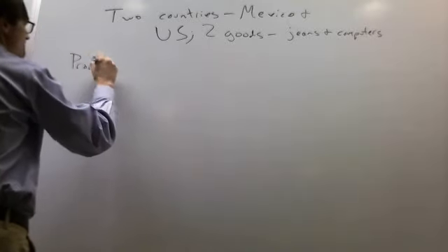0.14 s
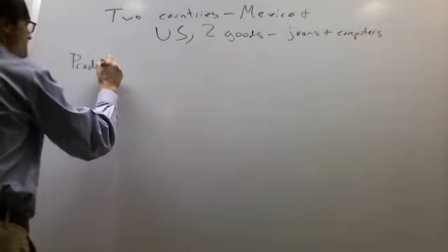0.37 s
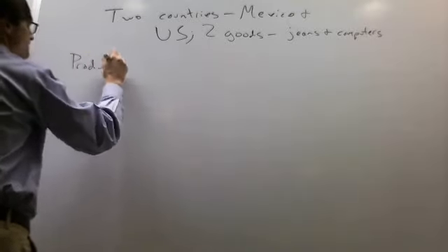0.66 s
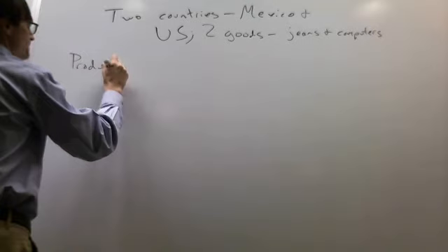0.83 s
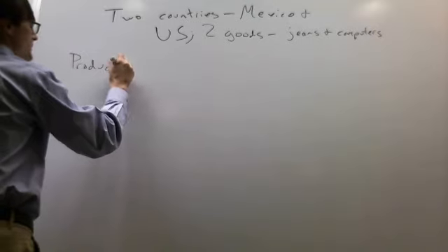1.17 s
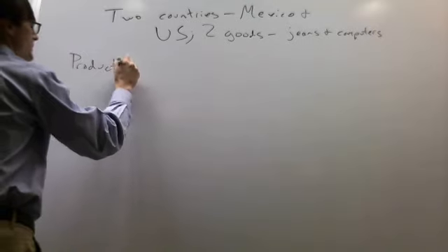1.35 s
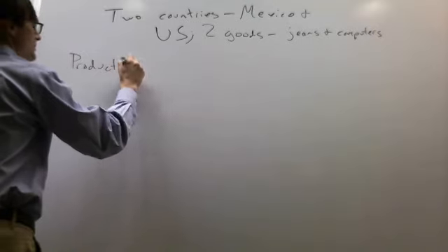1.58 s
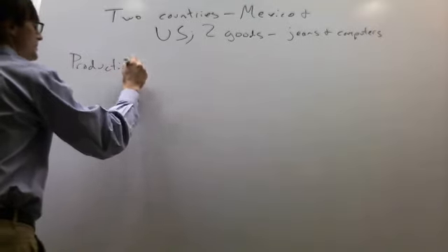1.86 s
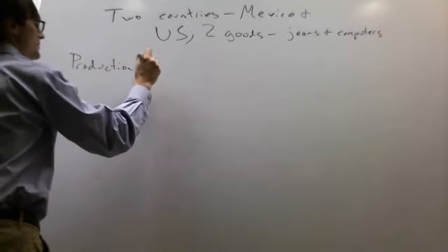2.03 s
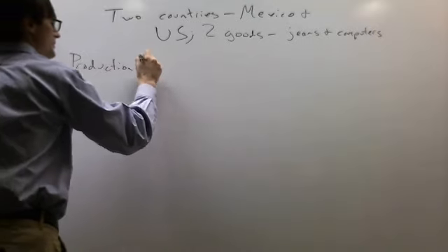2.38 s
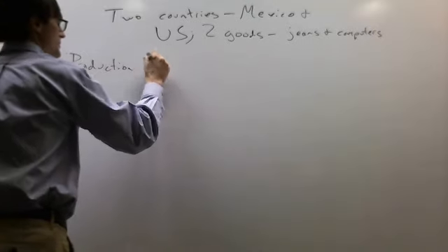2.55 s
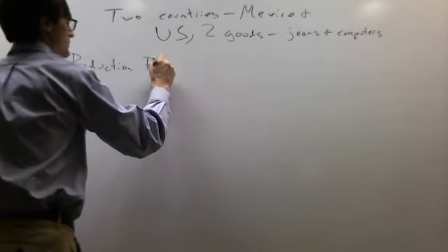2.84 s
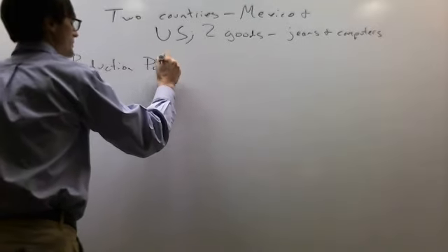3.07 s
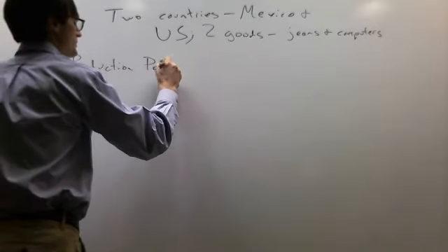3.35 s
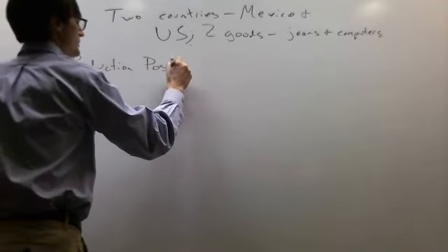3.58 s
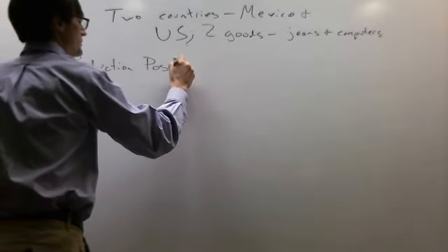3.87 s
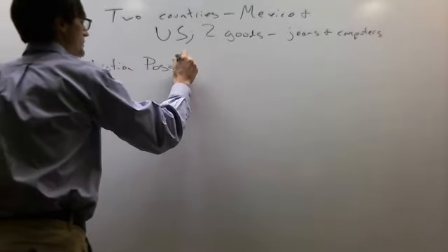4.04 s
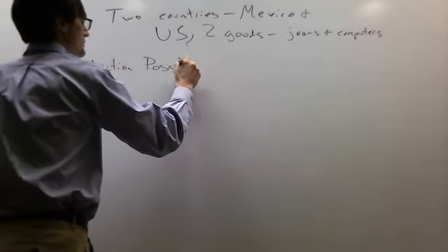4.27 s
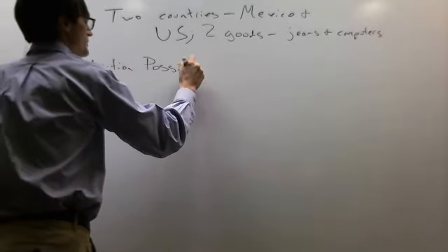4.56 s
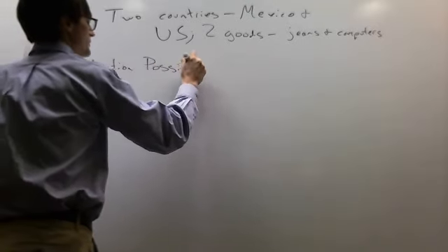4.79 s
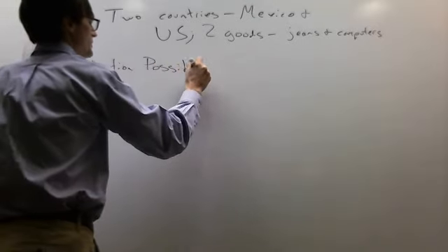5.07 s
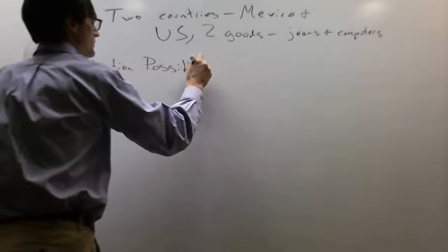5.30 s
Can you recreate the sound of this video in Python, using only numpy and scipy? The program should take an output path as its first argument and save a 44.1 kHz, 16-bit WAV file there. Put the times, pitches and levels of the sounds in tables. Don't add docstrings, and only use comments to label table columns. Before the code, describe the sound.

A felt marker writes on a hollow whiteboard in a lecture room, heard through a small, dull microphone. Very faint low ventilation hum runs throughout. After a tiny bump and light felt hiss, soft hollow knocks start at 0.2 s and continue at about 0.46, 0.7, 0.95, 1.1, 1.3, 1.4 and 1.7 s, the later ones lighter and some brighter. Near 0.5 s a scuff carries a very brief, faint squeak. After a gap, the strongest knock lands at 2.3 s, with a light second touch; firm taps follow at 2.6, 2.9, 3.2, 3.6 and 3.9 s, the last with a sharper tick. Quick duller taps come at 4.0 and 4.2 s, then a pause, then weaker, muffled ones from 4.6 to 5.4 s. Each knock rings the panel around the low mids, returns as lumpy wall echoes with a small slap a tenth of a second later, and is cut short.

```python
import sys
import numpy as np
from scipy import signal
from scipy.io import wavfile
from scipy.ndimage import uniform_filter1d

SR = 44100
rng = np.random.default_rng(int(sys.argv[2]) if len(sys.argv) > 2 else 0)


def voltage_ratio(level):
    return 10 ** (np.asarray(level, float) / 20)


def bounce(signal):
    frames = np.transpose(np.atleast_2d(signal))
    limited = np.clip(frames, -1, 1)
    pcm = np.round(limited * 32767).astype(np.int16)
    wavfile.write(sys.argv[1], SR, pcm)


N = 239259

# start_s, force_db, hardness_db (high ring over low), room_db, open_s (until suppressor closes)
LANDINGS = [(.19, -31, -7, -41, 0.12), (.464, -28.5, -5.5, -39, 0.13), (0.698, -27, -9.5, -40.5, 0.13),
            (0.947, -30.5, -7.5, -42, .095), (1.111, -33.5, 3, -39, 0.12),
            (1.283, -40.5, -9.5, -49.5, 0.025), (1.429, -34.5, .5, -40, 0.08), (1.719, -36.5, 5, -41, 0.11),
            (2.308, -23.5, -4.5, -37.5, 0.15), (2.565, -29, -4.5, -43.5, 0.12), (2.877, -29, -3, -41, .15),
            (3.223, -27, -7, -41.5, 0.13), (3.572, -26.5, -3.5, -40.5, .15), (3.882, -29, 0.5, -40.5, .17),
            (4.039, -29, -10.5, -46, .115), (4.202, -33, -16, -50.5, 0.064), (4.64, -36.5, -3, -46.5, 0.11),
            (4.813, -34.5, -12.5, -45.5, 0.078), (4.971, -30.5, -17, -42.5, .095),
            (5.186, -37.5, -9, -46.5, 0.1), (5.363, -35.5, -14, -53, 0.061)]
# start_s, low_ring_hz, high_ring_hz, low_modes_db (over the rest),
# thud_db (re room answer)
HAND_PLACE = [(.19, 540, 724, 0, -13.5), (.46, 530, 740, 4, -24.5), (.95, 537, 737, 5, -15.5),
              (1.43, 522, 719, 11, -28), (1.72, 453, 730, 10, -28), (2.3, 453, 679, -1.5, -9.5),
              (2.88, 477, 732, -2.5, -14.5), (3.22, 504, 730, -9, -18), (3.57, 484, 725, -10.5, -13.5),
              (3.88, 464, 712, -5, -15.5), (4.2, 469, 662, -9, -9.5), (4.64, 467, 677, 1.5, -11),
              (4.81, 470, 735, 4.5, -11), (4.97, 483, 887, 2, -11.5), (5.19, 473, 656, 1.5, -9),
              (5.36, 473, 887, 2.5, -7)]
# start_s, level_db, pitch_hz
BUMPS = [(.002, -61, 276), (0.062, -65, 272), (.25, -38, 150), (0.291, -49, 140), (2.669, -52, 163),
         (2.98, -50, 137.5), (3.34, -48, 261), (3.988, -57, 110), (4.145, -46.5, 129), (4.75, -51, 173),
         (4.919, -55, 258), (5.073, -48, 162), (0.144, -72, 285), (0.414, -55, 276), (0.914, -62, 416),
         (2.154, -59.5, 450), (2.239, -59, 293), (2.284, -83, 443), (2.736, -55.5, 351), (3.41, -58.5, 342),
         (4.602, -53.5, 269)]
# start_s, scuff_db, tick_db
SKIDS = [
    (0.466, -56.5, -60),
    (.7, -80, -61),
    (1.114, -58.5, -66),
    (1.434, -70.5, -61),
    (2.305, -68, -60),
    (2.874, -61, -78),
    (3.221, -69.5, -58.5),
    (3.881, -60, -55),
    (5.187, -73, -67),
]
# start_s, level_db, pitch_hz
RETOUCHES = [(.575, -51, 555), (.822, -59, 534), (1.222, -56.5, 649), (2.416, -44, 560),
             (2.688, -50.5, 600), (2.99, -58, 547), (3.338, -53, 562), (3.686, -51, 600), (3.995, -55, 600)]
# pitch_hz, level_db, t60_s
LOW_MODES = [(254.7, -8, 0.27), (286.7, -13.5, 0.15), (333.3, 0.5, 0.12), (413, -3, 0.11),
             (443.4, -6.5, 0.059)]
MIDDLE_MODES = [(467, -4.5, 0.084), (507, -0.5, .1), (543, -1, 0.15), (582.4, -3.5, 0.14),
                (630, -4.5, 0.11)]
TOP_MODES = [(687.6, 6, 0.039), (773, -2, 0.073), (827.3, -6, 0.071), (914, -15, 0.063), (1053, -21, 0.041)]
THUD_MODES = [(79, -18.5, 0.066), (134, -7.5, 0.093), (142.7, -0.5, 0.23), (204.3, -3, 0.29)]
# delay_s, low_modes_db, upper_modes_db, thud_db
WALL_ECHOES = [(0.013, 3.5, 2.5, 4), (0.021, -2, -1, 2.5), (0.033, 2.5, 2.5, -25), (.053, 4, 8, 3.5),
               (.069, -8, 6, -8.5), (.083, 2.5, -1.5, -17), (0.092, -3, 5, -1.5), (.117, -7.5, -8.5, 14),
               (.129, -12.5, 6.5, -12), (.149, 1, -2.5, -4.5), (.168, 8, 1.5, -1.5), (.19, -14, 7.5, -9.5)]
# start_s, length_s, hiss_db, centre_hz, spread_octaves
FELT_STROKES = [(0, 0.27, -81, 5320, .35), (0.202, 0.092, -73, 5340, 0.15), (0.28, 0.094, -78, 5350, 0.26),
                (0.462, 0.025, -70, 5270, 0.18), (0.487, 0.058, -78.5, 5200, 0.3),
                (0.694, 0.11, -83.5, 5200, 0.34), (0.966, 0.046, -79, 5500, .25),
                (1.13, 0.035, -79.5, 4600, 0.35), (1.433, 0.029, -78.5, 5500, 0.256),
                (1.846, 0.13, -84.5, 5360, 0.28), (2.303, 0.088, -80, 4030, 0.18),
                (2.293, 0.054, -78.5, 5500, 0.11), (2.575, 0.13, -84, 5300, 0.31),
                (2.833, 0.019, -75.5, 5800, 0.08), (2.865, 0.06, -80, 4800, 0.36),
                (3.101, 0.13, -85, 5430, 0.11), (3.117, 0.082, -91, 7900, 0.12),
                (4.165, 0.029, -86, 5500, .2), (4.23, 0.13, -78.5, 4640, .4),
                (4.43, 0.061, -87, 5500, 0.14), (4.962, 0.11, -84.5, 5160, 0.31),
                (5.277, 0.045, -83, 5300, 0.057)]
# time_s, level_db, stick_slip_hz
SQUEAK = [
    (0.465, -77, 1700),
    (0.497, -61, 1735),
    (0.521, -75.5, 1720),
    (0.535, -66, 1630),
]
# multiple (of stick-slip rate), level_db
SQUEAK_ORDERS = [(1, 6.5), (1.06, 2.5), (1.15, -18.5), (.94, -0.5), (2, 1.5), (1.92, -1), (1.96, -8)]
# pitch_hz, density_db_per_hz
AIR_SPECTRUM = [(18, -74), (30, -52), (60, -23), (99, -7.5), (289, 0), (380, -7), (478, -7), (690, -13),
                (1120, -21), (1540, -23.5), (4110, -31), (5930, -25.5), (7120, -32), (7500, -41),
                (9000, -45), (11900, -45)]
# pitch_hz, level_db
WHINE = [(8000, -111)]

TICK_DB, TICK_PER_HARD = -40.5, 0.24
SCUFF_DB, SCUFF_PER_HARD = -36, 0.56
EDGE_DB, EDGE_PER_HARD = -15, 0.94
TOP_DB, TOP_PER_HARD = -3.5, 0.65
FADE_DB_PER_S, CUT_DB_PER_S = 89, 382
THUD_FADE_DB_PER_S, THUD_CUT_DB_PER_S, THUD_OPEN_SHARE = 33.5, 224.5, 0.34
FAR_WALL_S, LULL_DB, LULL_S, REBOUND_DB, REBOUND_S = 0.1085, -8.5, 0.029, 1, 0.026
AIR_DB, SETTLE_S = -66.5, 0.55
MID_DB, EARLY_MID_DB, TOP_HISS_DB, EARLY_TOP_DB = 1.13, 3.5, 2.5, -12


def knocks():
    out, t = np.zeros(N), np.arange(round(0.07 * SR)) / SR
    scuff_shape = (1 - np.exp(-t / 0.0019)) * np.exp(-t / 0.017)
    grits = rng.standard_normal((len(LANDINGS), len(t)))
    for (s, force_db, hard_db, *_), grit in zip(LANDINGS, grits):
        low_hz, high_hz, *_ = curve(HAND_PLACE, s)
        tick_db = force_db + TICK_DB + TICK_PER_HARD * hard_db
        edge_db = force_db + EDGE_DB + EDGE_PER_HARD * hard_db
        scuff_db = force_db + SCUFF_DB + SCUFF_PER_HARD * hard_db
        add(out, s - 0.006, voltage_ratio(force_db - 34) * burst(0.96 * low_hz, 0.0019))
        add(out, s - 0.0018, voltage_ratio(force_db - 2) * burst(low_hz, 0.0057))
        add(out, s - 0.0018, voltage_ratio(force_db + hard_db) * burst(high_hz, 0.0043))
        add(out, s, voltage_ratio(tick_db) * burst(1246, 0.0015))
        add(out, s - 0.001, voltage_ratio(edge_db) * burst(956, 0.0048))
        add(out, s, voltage_ratio(scuff_db) * rough(grit, 1000, 820) * scuff_shape)
    for s, level_db, hz in BUMPS:
        add(out, s, voltage_ratio(level_db - 2) * burst(hz, 0.0087))
    return out


def burst(hz, peak_s):
    u = np.arange(round(6 * peak_s * SR)) / SR / peak_s
    swell = (u * np.exp(1 - u)) ** 3
    return -swell * np.sin(2 * np.pi * hz * (peak_s * u - 0.0018))


def skids():
    out, t = np.zeros(N), np.arange(round(0.07 * SR)) / SR
    shape = (1 - np.exp(-t / 0.0073)) ** 2 * np.exp(-t / 0.015)
    grits = rng.standard_normal((len(SKIDS), len(t)))
    for (s, scuff_db, tick_db), grit in zip(SKIDS, grits):
        add(out, s, voltage_ratio(scuff_db) * rough(grit, 1400, 800) * shape)
        add(out, s, voltage_ratio(tick_db) * burst(1280, 0.0033))
    return out


def retouches():
    out, t = np.zeros(N), np.arange(round(0.08 * SR)) / SR
    shape = (1 - np.exp(-t / 0.002)) * np.exp(-t / 0.018)
    grits = rng.standard_normal((len(RETOUCHES), len(t)))
    for (s, level_db, hz), grit in zip(RETOUCHES, grits):
        add(out, s, voltage_ratio(level_db - 8.5) * rough(grit, hz, 300) * shape)
    return out


def answers():
    out, t = np.zeros(N), np.arange(round(0.26 * SR)) / SR
    size = (3, len(t) + SR // 10)
    walls = rng.standard_normal(size) * (rng.random(size) < 900 / SR)
    detunes = 1 + 0.024 * rng.standard_normal((len(LANDINGS), 5))

    delay_s, *echo_db = np.transpose(WALL_ECHOES)
    late_s = t - delay_s[:, None]
    lumps = np.exp(-(late_s / np.where(late_s < 0, 0.005, 0.011)) ** 2)
    onset = np.clip(t / 0.0064, 0, 1) ** 2
    low, upper, bass = np.sqrt(voltage_ratio(echo_db) ** 2 @ lumps + voltage_ratio(-5) ** 2) * onset
    bass = bass + voltage_ratio(6.5) * np.exp(-((t - 0.005) / 0.001) ** 2)
    lull_db = LULL_DB * np.exp((t - FAR_WALL_S) / LULL_S)
    rebound_db = REBOUND_DB * np.exp((FAR_WALL_S - t) / REBOUND_S)
    lull = voltage_ratio(uniform_filter1d(np.where(t < FAR_WALL_S, lull_db, rebound_db), size=150))

    for (s, _, hard_db, room_db, open_s), detune in zip(LANDINGS, detunes):
        *_, low_db, thud_db = curve(HAND_PLACE, s)
        taps = np.cos(2.023 * np.arange(3) + 1.025 * s) @ walls
        share = voltage_ratio(np.array([low_db, 0, TOP_DB + TOP_PER_HARD * hard_db]))
        share = share / np.linalg.norm(share)
        board = share @ [low * rung(taps, LOW_MODES, detune),
                         upper * rung(taps, MIDDLE_MODES, detune),
                         upper * voltage_ratio(1 - 44 * t) * rung(taps, TOP_MODES, detune)]
        level = closing(t, room_db, FADE_DB_PER_S, CUT_DB_PER_S, open_s) * lull
        thud_level = closing(t, room_db + thud_db, THUD_FADE_DB_PER_S, THUD_CUT_DB_PER_S,
                             THUD_OPEN_SHARE * open_s)
        thud = thud_level * bass * rung(taps, THUD_MODES, detune)
        add(out, s, level * board + thud)
        slap = level[round(FAR_WALL_S * SR) + 75]
        add(out, s + FAR_WALL_S, slap * voltage_ratio(-6) * burst(490, 0.0036))
        add(out, s + FAR_WALL_S, slap * voltage_ratio(-10) * burst(759, 0.0053))
    return out


def rung(taps, modes, detune):
    t = np.arange(SR // 5) / SR
    ring = sum(voltage_ratio(level_db - 60 * t / t60_s) * np.sin(2 * np.pi * hz * d * t)
               for (hz, level_db, t60_s), d in zip(modes, detune))
    ring = ring * (1 - np.exp(-t / 0.0018)) ** 2
    x = signal.fftconvolve(taps, ring)[SR // 10:len(taps)]
    power = uniform_filter1d(uniform_filter1d(x ** 2, 500), 500)
    return x / np.sqrt(power + 1e-20)


def closing(t, level_db, fade_db_per_s, cut_db_per_s, open_s):
    return voltage_ratio(level_db - fade_db_per_s * t - cut_db_per_s * np.maximum(t - open_s, 0))


def felt():
    t = np.arange(N // 128 + 5) * 128 / SR
    hz = np.fft.rfftfreq(512, 1 / SR)[:, None]
    power = np.zeros((257, len(t)))
    for s, length_s, hiss_db, centre_hz, spread_octaves in FELT_STROKES:
        band = np.exp(-(np.log2((hz + 1) / centre_hz) / spread_octaves) ** 2)
        press, lift = (t - s) / 0.013, (s + length_s - t) / 0.039 + 0.5
        touch = np.clip(np.minimum(press, lift), 0, 1)
        power += voltage_ratio(hiss_db) ** 2 * band / band.mean() * touch ** 2
    noise = rng.standard_normal(N + 1024)
    fibres = signal.stft(noise, nperseg=512, noverlap=384)[2][:, :len(t)]
    out = signal.istft(fibres * np.sqrt(power), nperseg=512, noverlap=384)[1][:N]
    add(out, SQUEAK[0][0], felt_squeak())
    return out


def felt_squeak():
    t = np.arange(SQUEAK[0][0], SQUEAK[-1][0], 1 / SR)
    level_db, hz = curve(SQUEAK, t)
    slips = rng.standard_normal(len(t))
    tone = sum(voltage_ratio(order_db) * rough(slips, k * hz, 149) for k, order_db in SQUEAK_ORDERS)
    return voltage_ratio(level_db + 3.5) * evened(tone) * signal.windows.tukey(len(t), 0.3)


def air():
    frames, hz = N // 256 + 5, np.fft.rfftfreq(1024, 1 / SR)
    a, b, patches = rng.standard_normal((frames, 513, 3)).T
    patches = evened(uniform_filter1d(uniform_filter1d(patches, 5, 0), 9, 1))
    patchy_db = 0.45 + 2.6 / (1 + (hz / 800) ** 2)
    early = np.exp(-np.arange(frames) * 256 / SR / SETTLE_S)
    air_hz, density_db = np.transpose(AIR_SPECTRUM)
    spectrum_db = np.interp(np.log(hz + 1), np.log(air_hz), density_db)
    z = (a + 1j * b) * voltage_ratio(spectrum_db[:, None] + patchy_db[:, None] * patches)
    z = z * np.where(hz[:, None] > 7600, voltage_ratio(TOP_HISS_DB + EARLY_TOP_DB * early), 1)
    z = z * voltage_ratio(np.outer((hz > 800) * (hz < 3800), MID_DB + EARLY_MID_DB * early))
    hum = evened(signal.istft(z, nperseg=1024, noverlap=768)[1][:N])
    t = np.arange(N) / SR
    whine = sum(voltage_ratio(level_db + 3) * np.sin(2 * np.pi * f * t) for f, level_db in WHINE)
    return voltage_ratio(AIR_DB) * hum + whine


def rough(noise, hz, width_hz):
    return evened(resonate(resonate(noise, hz, width_hz), hz, width_hz))


def resonate(x, hz, width_hz):
    turn = np.exp(2j * np.pi * np.cumsum(hz * np.ones(len(x))) / SR)
    r = np.exp(-np.pi * width_hz / SR)
    return 2 * (turn * signal.lfilter([1 - r], [1, -r], x / turn)).real


def evened(x):
    return x / np.sqrt(np.mean(x ** 2) + 1e-20)


def add(mix, s, sound):
    part = mix[round(s * SR):][:len(sound)]
    part += sound[:len(part)]


def curve(rows, t):
    s, *columns = np.transpose(rows)
    return [np.interp(t, s, c) for c in columns]


def scene():
    return (knocks() + answers() + felt() + air() + skids() + retouches())[None]


def band_limit(x):
    return signal.sosfilt(signal.butter(12, 11990, fs=SR, output="sos"), x)


def record(dry):
    bass_cut = signal.butter(2, 70, "high", fs=SR, output="sos")
    thin = signal.sosfilt(bass_cut, dry)
    return band_limit(thin)


dry = scene()
out = record(dry)
bounce(out)
```